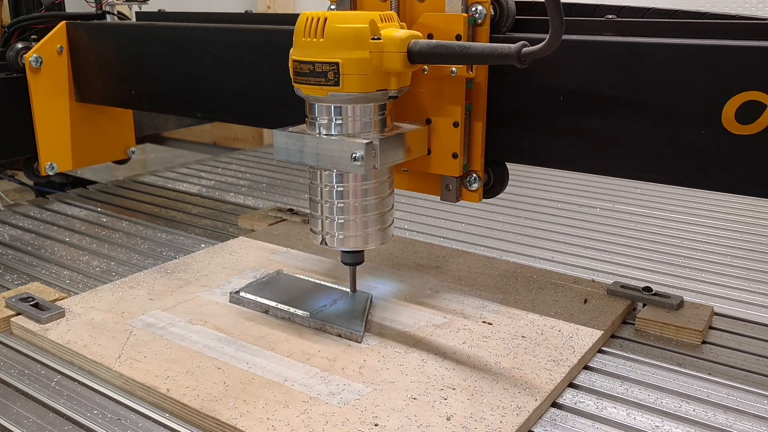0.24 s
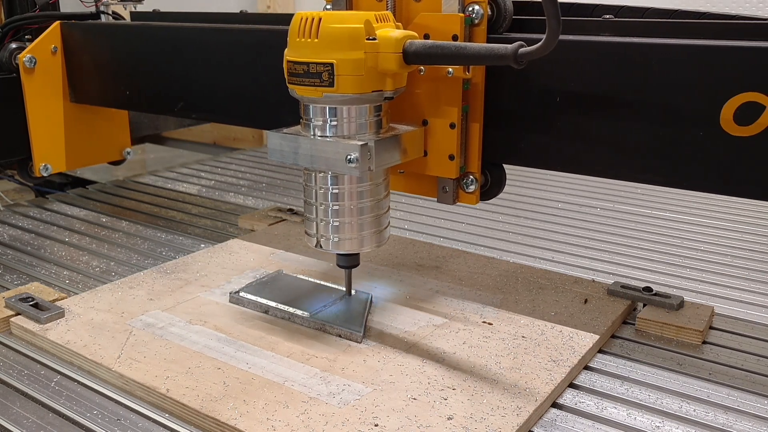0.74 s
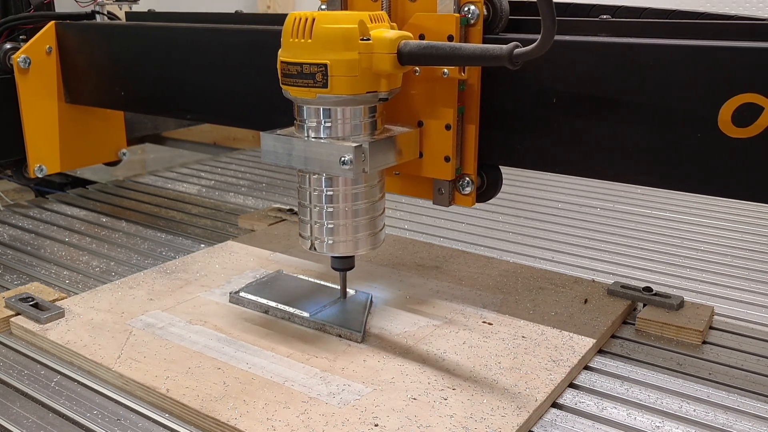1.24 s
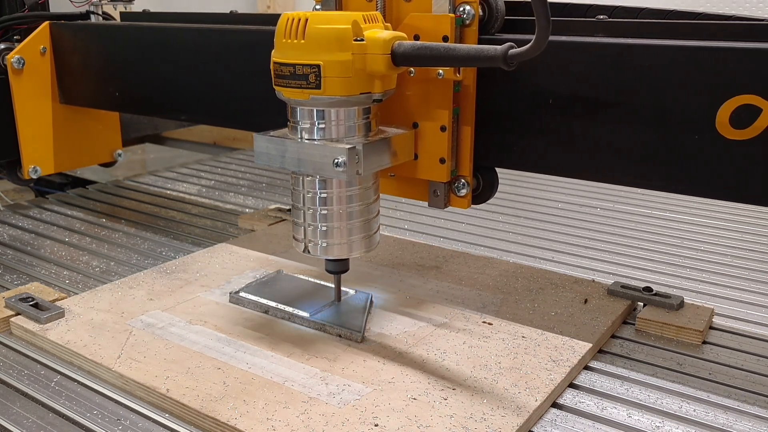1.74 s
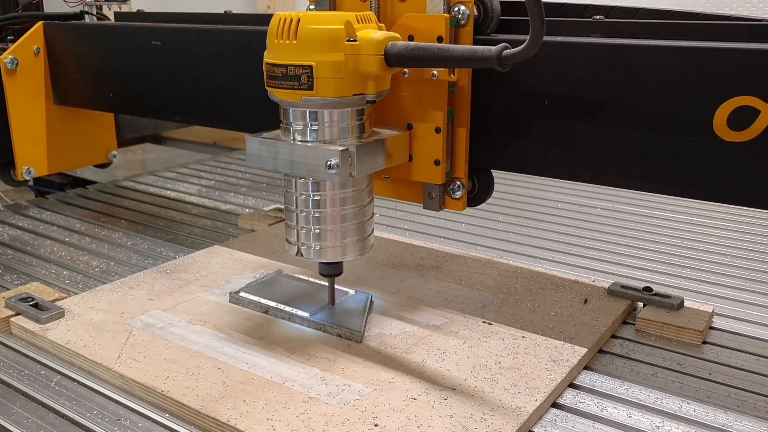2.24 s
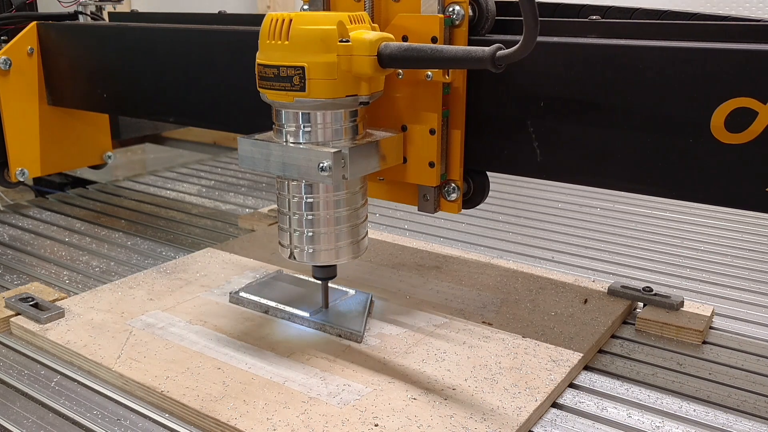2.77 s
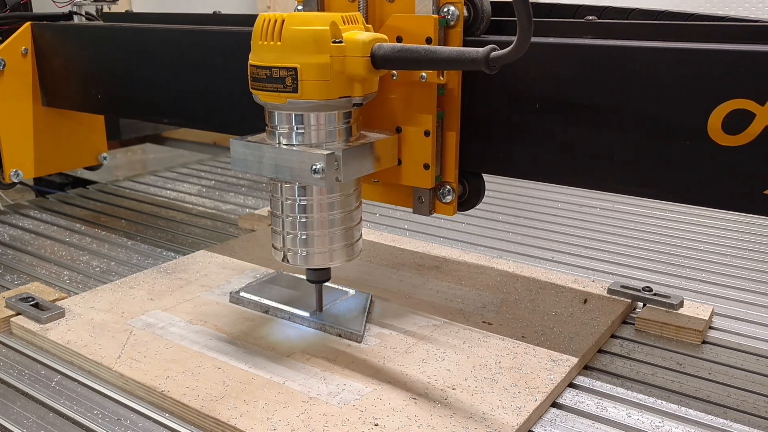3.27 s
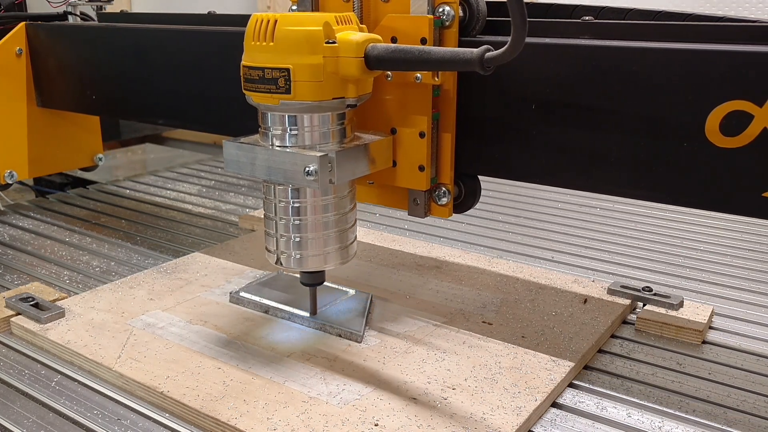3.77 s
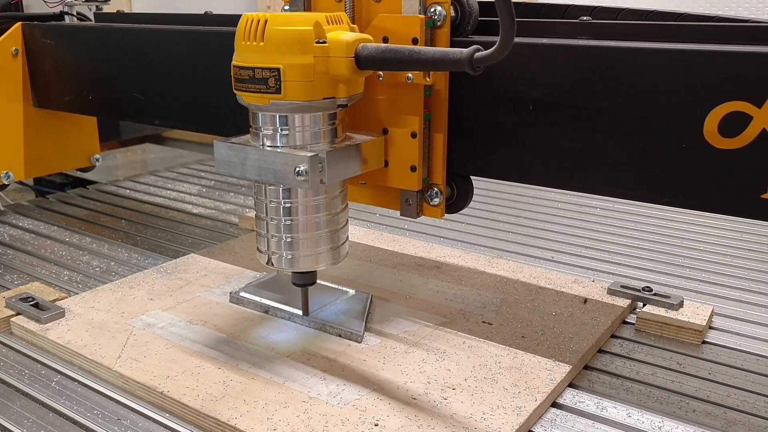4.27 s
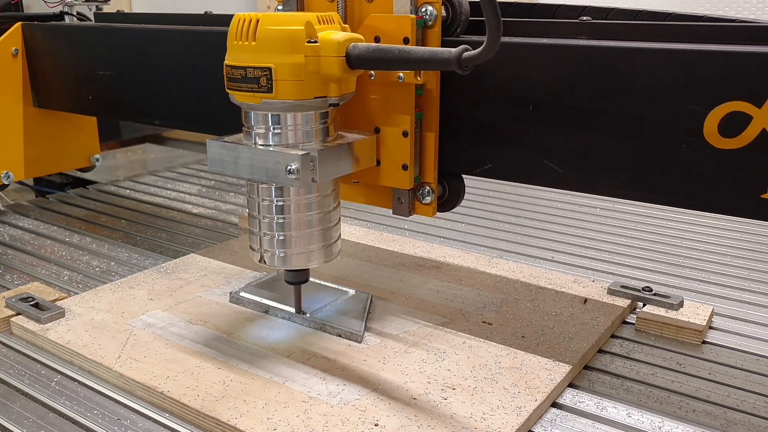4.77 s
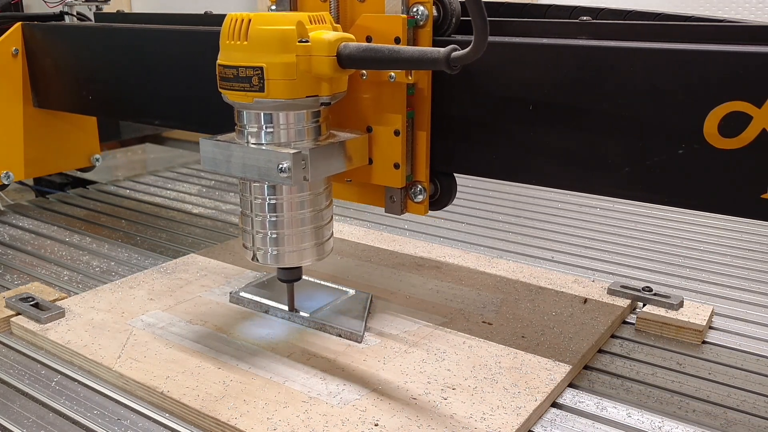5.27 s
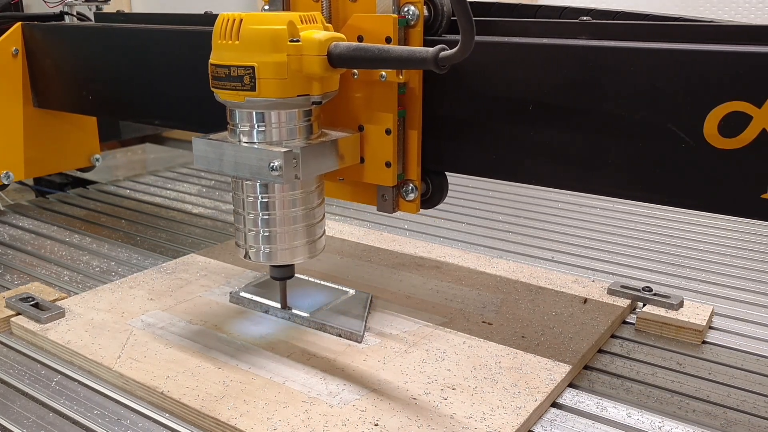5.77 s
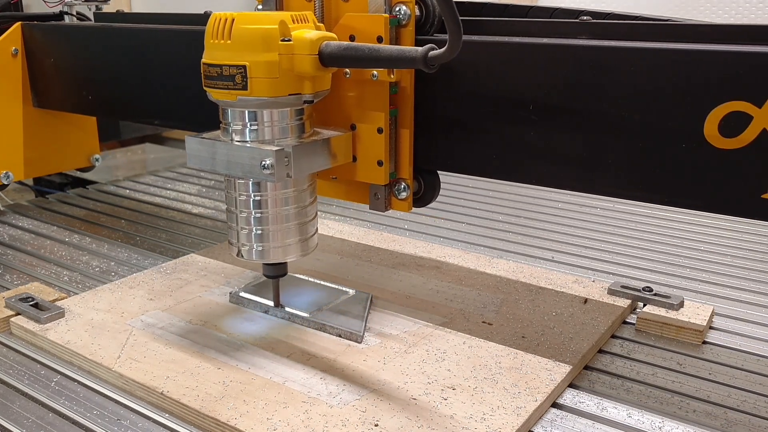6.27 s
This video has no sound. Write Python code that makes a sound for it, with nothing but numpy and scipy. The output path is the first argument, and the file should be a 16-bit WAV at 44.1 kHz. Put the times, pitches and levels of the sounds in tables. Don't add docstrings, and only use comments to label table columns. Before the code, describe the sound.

Already running at full speed, a router motor hums, whines and hisses as its bit grinds through metal. Fast flute knocks blur into a coarse drone with metallic ringing and flickering chatter. Brief dips and bites roughen the first edge; after the corner near four seconds, the low knock weakens and a higher cutting tone grows. Close phone stereo in a workshop, bright and light in bass, with no stop.

```python
import sys
import numpy as np
from scipy import signal
from scipy.fft import rfft, irfft
from scipy.io import wavfile
from scipy.ndimage import uniform_filter1d

SR = 44100
rng = np.random.default_rng(int(sys.argv[2]) if len(sys.argv) > 2 else 0)


def natural_amplitude(level_db):
    exponent = np.asarray(level_db, float) / 20
    return 10 ** exponent


def inscribe(sig):
    pcm = np.round(np.clip(np.atleast_2d(sig).T, -1, 1) * 32767)
    wavfile.write(sys.argv[1], SR, pcm.astype(np.int16))


N = 287532
HZ = np.fft.rfftfreq(N, 1 / SR) + 1e-3

TURN_S = (3.898, 3.95)


def columns(table):
    s, *rest = np.transpose(table)
    return [np.interp(np.arange(N) / SR, s, c) for c in rest]


def over_hz(table):
    hz, *rest = np.transpose(table)
    return [np.interp(np.log(HZ), np.log(hz), c) for c in rest]


def unit(x):
    return x / np.sqrt(np.mean(np.abs(x) ** 2))


def walk(rate):
    hold = int(SR / rate)
    steps = np.repeat(rng.standard_normal(N // hold + 1), hold)
    return unit(uniform_filter1d(uniform_filter1d(steps, hold), hold)[:N])


def bites(table):
    t = np.arange(0, N / SR, 1 / 500)
    total = np.zeros(len(t))
    for start, db, length in table:
        late = (t - start) / length
        late = np.where(late < 0, late / 0.5, late)
        total += db * np.exp(-late ** 2)
    return np.interp(np.arange(N) / SR, t, total)


def along(rule, bite_db):
    *edge_db, share, chance_db = rule
    t = np.arange(N) / SR
    drift = np.interp(t, (0, *TURN_S, N / SR), edge_db)
    calming = np.interp(t, TURN_S, (1, 0.45))
    return drift + share * bite_db + chance_db * calming * walk(9.)


def modes(table):
    power = 0
    for hz, width, db in table:
        power = power + natural_amplitude(2 * db) / (1 + (HZ / width * (1 - (hz / HZ) ** 2)) ** 2)
    return np.sqrt(power)


def tone(phase, db, pan_db, lead, wobble, rate):
    shake = (1 + wobble * (walk(rate) + 1j * walk(rate))) / np.sqrt(1 + 2 * wobble ** 2)
    z = np.sqrt(2) * natural_amplitude(db) * np.exp(1j * phase) * shake
    left = natural_amplitude(pan_db / 2) * z.real
    right = natural_amplitude(-pan_db / 2) * (z * np.exp(1j * lead)).real
    return np.array([left, right])


def noise(gate, response):
    # [f/Hz, share of noise arriving right first, share unrelated, left minus right/dB]
    ports = [(60, 0.41, 1, -2.5), (302, 0.68, 0.32, -1.5), (1240, 0.69, .02, 0.5), (2030, 1, 0.066, -4.5),
             (2700, 1, 0.26, -1), (3630, 1, 0.44, 10), (4000, 0.57, 0.51, 0.5), (5400, 0.15, 0.0026, 0),
             (6480, 0.23, 0.046, 0), (6800, 0.14, 0.11, 6), (7500, 0.28, 0.51, -2.5), (8600, 0.73, 0.75, 2),
             (11200, 0.54, 0.23, 2), (14500, .5, 0.37, 0)]
    lag_s, alike_hz = 1 / 2600, 1310
    first, unrelated, pan_db = over_hz(ports)
    first, unrelated = np.clip(first, 0, 1), np.clip(unrelated, 0, 1)
    lag = np.exp(2j * np.pi * lag_s * np.maximum(HZ - alike_hz, 0))
    from_right, from_left, wall_left, wall_right = rfft(gate * rng.standard_normal((4, N))) * response
    from_right = from_right * np.sqrt(first * (1 - unrelated))
    from_left = from_left * np.sqrt((1 - first) * (1 - unrelated))
    left = from_right + from_left + wall_left * np.sqrt(unrelated)
    right = from_right * lag + from_left / lag + wall_right * np.sqrt(unrelated)
    return unit(irfft(np.array([left * natural_amplitude(pan_db / 2), right * natural_amplitude(-pan_db / 2)]), N))


def unbalance_hum(shaft, hum_db):
    return tone(shaft, hum_db + 0.46 + 0.99 * walk(7.6), -1.3, -1.0, 0.1, rate=25.)


def slot_whine(shaft, ripple, whine_db):
    # [ripple steps from the 12th order, to the lower line/dB, to the upper line/dB,
    # left minus right/dB, right leads/rad]
    sidebands = [
        (-2, -13, -99, -5, 4.5),
        (-1, -2.5, -99, -1, 5.05),
        (0, 6.5, -99, 8.5, 4.15),
        (1, -99, 5, 2.5, 4.93),
        (2, -99, -4, -0.5, 6.2),
        (3, -99, -7.5, -4, 4.84),
        (4, -99, -23, -3, 5.6),
    ]
    upper_db = whine_db - 1.0 + 0.5 * walk(5.81)
    lower_db = whine_db - 5 + 0.38 * walk(7.2)
    total = 0
    for step, to_lower, to_upper, pan, lead in sidebands:
        db = np.maximum(lower_db + to_lower, upper_db + to_upper)
        total = total + tone(12 * shaft + round(step) * ripple, db, pan, lead, 0.079, rate=30.)
    return total


def fan(shaft, bite_db):
    # [f/Hz, level per Hz/dB]
    air = [(30, -33), (100, -16), (300, -24), (1000, -14), (2400, 1), (3400, 2), (4300, -9.5), (5000, -24),
           (5600, -1.5), (6300, 1.5), (7500, -5), (9400, -7.5), (11000, -13.5), (15500, -49)]
    # [start/dB, before the corner/dB, after it/dB, end/dB, share of a bite, chance/dB]
    draught = (-33.5, -34.5, -34, -34.5, 0.3, 0.86)
    flutter = 1 + 0.25 * np.cos(2 * shaft) + 0.11 * np.cos(shaft)
    gate = flutter * natural_amplitude(0.79 * walk(14.))
    return natural_amplitude(along(draught, bite_db) + 7.5) * noise(gate, natural_amplitude(over_hz(air)[0]))


def cutter(shaft, ripple, bite_db):
    # [t/s, flute tone/dB, 4th order from the off-centre bit/dB]
    cut = [(0.0, -19, -29), (0.11, -22, -39), (0.2, -25, -27.5), (0.33, -17.5, -27), (0.54, -20, -34),
           (1.5, -20.5, -32), (1.74, -21, -36), (1.78, -22.5, -33.5), (2.52, -20, -33.5),
           (2.58, -22, -36.5), (2.69, -22.5, -32), (2.81, -21.5, -32), (3.76, -22, -33.5),
           (4.1, -22.5, -28), (4.28, -25, -35), (5.9, -27, -35), (6.39, -27, -31.5), (6.52, -25, -32)]
    # [order, trim/dB, left minus right/dB, right leads/rad, wobble 0-1]
    loud = [
        (2, 1, -3.5, -0.38, 0.1),
        (3, -6, 3, 0.97, 0.4),
        (4, 0, -1, 0.31, 0.21),
        (5, 2.5, -2.5, -0.034, 0.04),
        (7, 3, -1, 0.84, 0.19),
    ]
    # [order, ripple steps added, first edge/dB, second edge/dB, left minus right/dB,
    # right leads/rad, wobble 0-1]
    faint = [(0.99, 1, -53, -56, -7, 0.1, 0.4), (2, 0.99, -45.5, -66, 7, -6, 0.9),
             (6.05, 0, -36.5, -41.5, -11.5, -0.7, 0.5), (8.034, 0, -37.5, -35.5, -6, 0, 0.44),
             (10.08, 0.017, -43, -45, -10.5, 4, 0.94), (10.984, 0.023, -48, -40, 4, 4, 0.34),
             (13.05, 0, -48, -43, 7, 4.5, 0.3), (14, 0, -39.5, -48, -3, 6, 0.75),
             (15.2, 0, -42.5, -52, -5, 7.5, 0.8), (16, 0, -43.5, -52, -10, 8.5, 0.8),
             (23.7, 0.012, -41, -59, 5, 5.5, 0.8)]
    # [start/dB, before the corner/dB, after it/dB, end/dB, share of a bite, chance/dB]
    fifth = (-27, -31, -25, -21, 1.24, 0.7)
    seventh = (-33.5, -30.5, -27, -26.5, 0.8, 2)
    t = np.arange(N) / SR
    load_db, runout_db = columns(cut)
    levels = (load_db, runout_db, runout_db, along(fifth, bite_db), along(seventh, bite_db))
    total = 0
    for db, (order, trim, pan, lead, wobble) in zip(levels, loud):
        phase = round(order) * shaft + order ** 2
        total = total + tone(phase, db + trim, pan, lead, wobble, rate=45.)
    for order, step, first_db, second_db, pan, lead, wobble in faint:
        phase = round(order) * shaft + round(step) * ripple + order ** 2
        db = np.interp(t, TURN_S, (first_db, second_db)) + 2.6 * walk(2.5)
        total = total + tone(phase, db, pan, lead, wobble, rate=35.)
    return total


def chips(shaft, bite_db, fit_db):
    # [f/Hz, width/Hz, level/dB]
    board_modes = [(855, 190, -9.5), (1009, 50, -9), (1192, 27, -1.5), (1296, 61, 0.5), (1560, 530, -13.5),
                   (1857, 31, -3), (1980, 190, -10), (2064, 59, -6)]
    plate_modes = [(2570, 460, -3.5), (3683, 33, 2), (3910, 36, 0), (4170, 46, 1), (4300, 120, -17),
                   (4500, 79, -4.5), (4667, 33, 2.5), (4970, 66, 2.5), (5400, 160, -4)]
    frame_modes = [(155, 10.4, -14.5), (240.6, 19, -7), (292, 20, -3.5), (385, 22, -5), (494.5, 28, 4.5),
                   (606, 180, -5.5)]
    # [start/dB, before the corner/dB, after it/dB, end/dB, share of a fit (board) or bite
    # (plate, frame), chance/dB]
    rattle = (-28, -26.5, -27.5, -26.5, 0.1258, 0.9)
    ring = (-32, -29, -30, -30.5, .5, 0.9)
    thump = (-36.5, -36, -39.5, -37, 0.06, 0.9)
    passes = shaft / np.pi
    size = natural_amplitude(2.53 * rng.standard_normal(int(passes[-1]) + 9))[passes.astype(int)]
    gate = size * (0.71 + np.exp(-(passes % 1) / 0.39))
    board = natural_amplitude(along(rattle, fit_db) + 4.0) * noise(gate, modes(board_modes) / (1 + (720 / HZ) ** 8))
    plate = natural_amplitude(along(ring, bite_db) + 4.0 + 0.78 * walk(14.)) * noise(gate, modes(plate_modes))
    frame = natural_amplitude(along(thump, bite_db) + 0.17) * noise(gate, modes(frame_modes) / (1 + (HZ / 900) ** 4))
    return board + plate + frame


def bit_chatter(shaft, fit_db):
    # [t/s, f/Hz]
    pitch = [
        (0, 1282),
        (1.7, 1288),
        (3.9, 1290),
        (6.52, 1284),
    ]
    # [start/dB, before the corner/dB, after it/dB, end/dB, share of a fit, chance/dB]
    strength = (-30.5, -27.5, -27.5, -38, 0.87, 0)
    db = along(strength, fit_db)
    swing = 2 * np.pi * np.cumsum(columns(pitch)[0] + 3 * walk(6.7)) / SR
    direct = tone(swing, db - 1.5, -0.078, -0.1, 0.23, rate=32.)
    copy = tone(swing + 2 * shaft, db - 9.5, -2.6, 0.52, 0.65, rate=35.)
    return direct + copy


def scene():
    # [t/s, whine/dB, unbalance hum/dB]
    motor = [
        (0.0, -24, -57),
        (0.02, -26.5, -44.5),
        (1.29, -25, -40),
        (1.61, -27, -47),
        (1.85, -27, -42.5),
        (3.87, -27, -50),
        (4.21, -27.5, -42.5),
        (6.15, -29, -38.5),
        (6.52, -28.5, -39),
    ]
    # [t/s, upper slot line f/Hz]
    speed = [(0.0, 3277.0), (0.15, 3247), (0.46, 3264), (1.45, 3276), (1.81, 3265), (2.29, 3280),
             (2.46, 3257), (2.68, 3262), (3.16, 3273.3), (3.32, 3257), (3.66, 3275), (3.95, 3260),
             (5.26, 3267), (5.48, 3259), (5.89, 3276.5), (6.02, 3264), (6.38, 3261), (6.51, 3276)]
    # [t/s, level/dB, length/s]
    dig_ins = [(0.0, 0, 0.048), (.2, -1.5, 0.11), (.47, 2.5, 0.077), (.53, -6, 0.017), (1.35, 4, 0.049),
               (1.5, 1, 0.036), (1.72, -14, 0.027), (2.02, 3.5, 0.052), (2.26, -5, 0.026),
               (2.4, -1.5, 0.53), (2.48, 1, .05), (2.86, -4, .05), (3.251, -5, 0.025), (3.31, 3, 0.1),
               (3.87, 1, 0.052), (3.95, 4, 0.046), (5.08, 3.5, 0.054), (5.557, -1.5, .02),
               (5.619, 2.5, .04), (5.82, -4.5, 0.047), (5.95, 1, .08), (6.37, -2, 0.096)]
    # [t/s, level/dB, length/s]
    fits = [(0.0, 12, 0.038), (.2, -14, 0.12), (.48, 1, 0.039), (.57, 9, 0.022), (.77, 9, 0.03),
            (.95, 6, .06), (1.3, 9.5, 0.52), (1.82, 9.5, .04), (2.02, 11, 0.019), (2.15, 14, 0.062),
            (2.43, 11, .04), (2.71, 9, 0.11), (3.02, 8, .1), (3.3, 11, 0.12), (3.55, 5, 0.079),
            (3.7, 7, 0.053), (4.02, -19, 0.093), (4.58, 4, .08), (5.08, -5, 0.039), (5.3, 1, .08),
            (5.63, 2, .04), (5.86, 14, 0.044), (6.1, 8, 0.099), (6.42, 9, .05)]
    ripple_hz, burst_s = 120., 0.0005
    whine_db, hum_db = columns(motor)
    slot_hz = columns(speed)[0] + 1.2 * walk(8.)
    bite_db, fit_db = bites(dig_ins), bites(fits)
    shaft = 2 * np.pi * np.cumsum((slot_hz - ripple_hz) / 12) / SR
    ripple = 2 * np.pi * ripple_hz * (np.arange(N) / SR - burst_s)
    running = unbalance_hum(shaft, hum_db) + slot_whine(shaft, ripple, whine_db) + fan(shaft, bite_db)
    cutting = cutter(shaft, ripple, bite_db) + chips(shaft, bite_db, fit_db) + bit_chatter(shaft, fit_db)
    return running + cutting


def roll_off(x):
    return signal.sosfilt(signal.butter(12, 15060, fs=SR, output="sos"), x)


def record(dry):
    # [f/Hz, width/Hz, depth/dB]
    casing = [(2483, 115, -4), (5180, 520, -8), (7810, 370, -5.5), (10760, 220, -3)]
    dip_db = sum(db * np.exp(-((HZ - hz) / width) ** 2) for hz, width, db in casing)
    ports = dry - irfft(rfft(dry.mean(axis=0)) * (1 - natural_amplitude(dip_db)), N)
    thin = signal.sosfilt(signal.butter(3, 90, "high", fs=SR, output="sos"), ports)
    over = np.maximum(np.abs(thin) - 0.55, 0)
    rounded = thin - np.sign(thin) * (over - 0.3 * np.tanh(over / 0.3))
    return roll_off(rounded)


dry = scene()
out = record(dry)
inscribe(out)
```